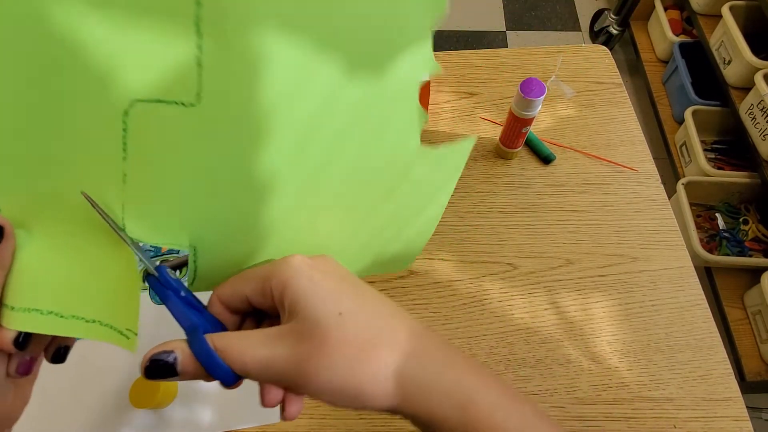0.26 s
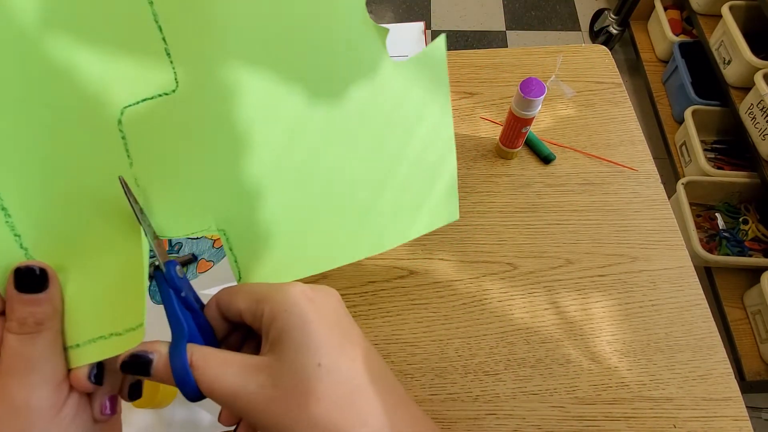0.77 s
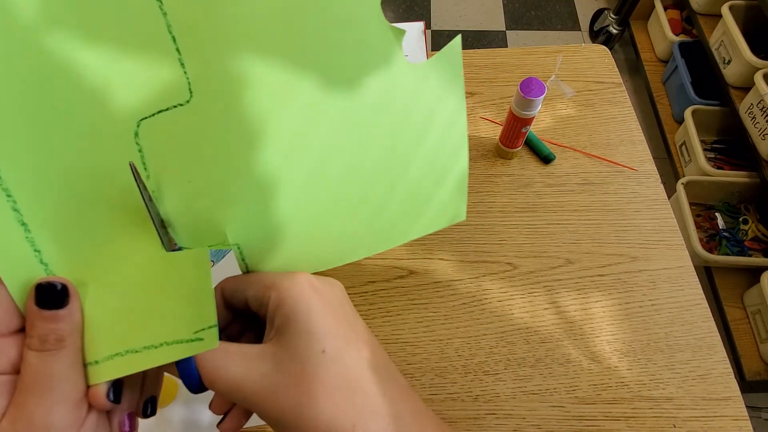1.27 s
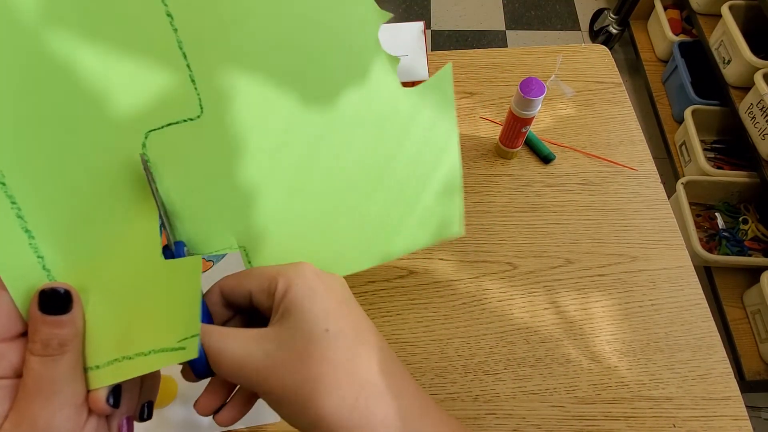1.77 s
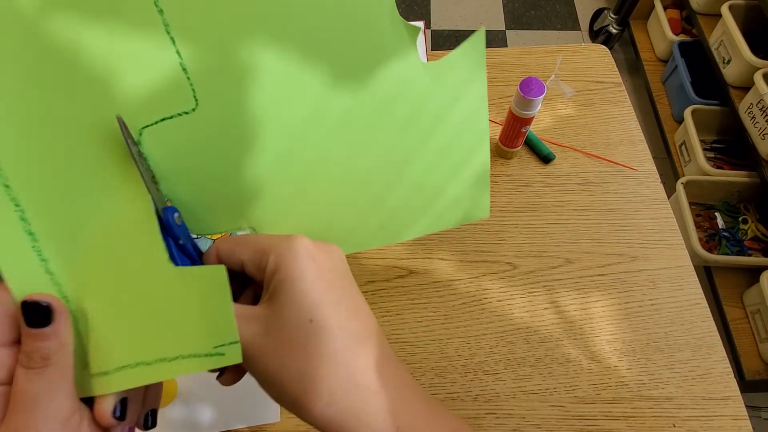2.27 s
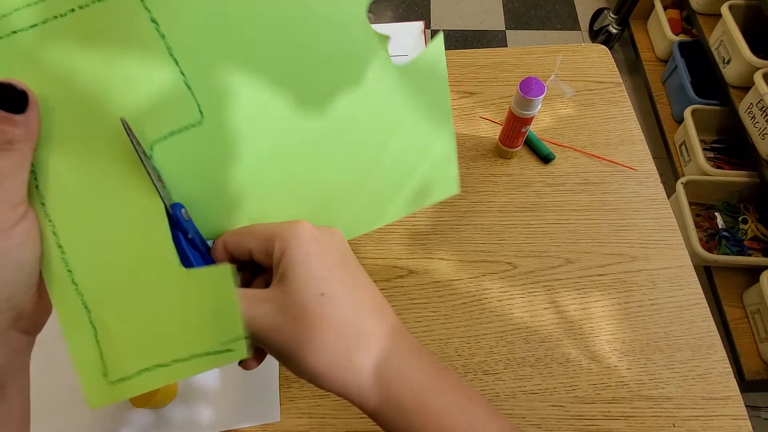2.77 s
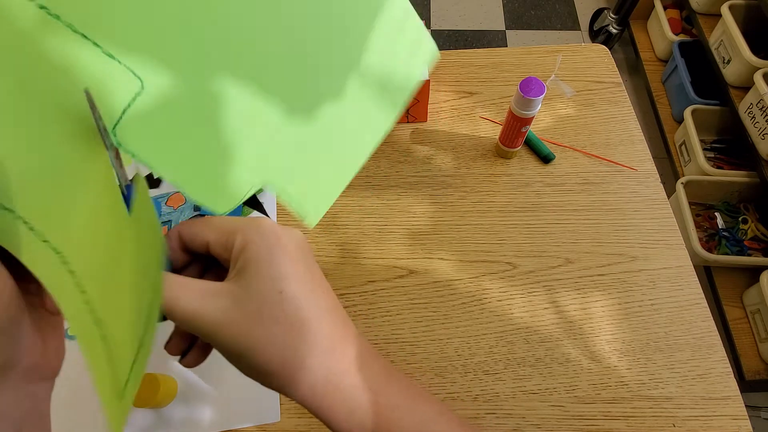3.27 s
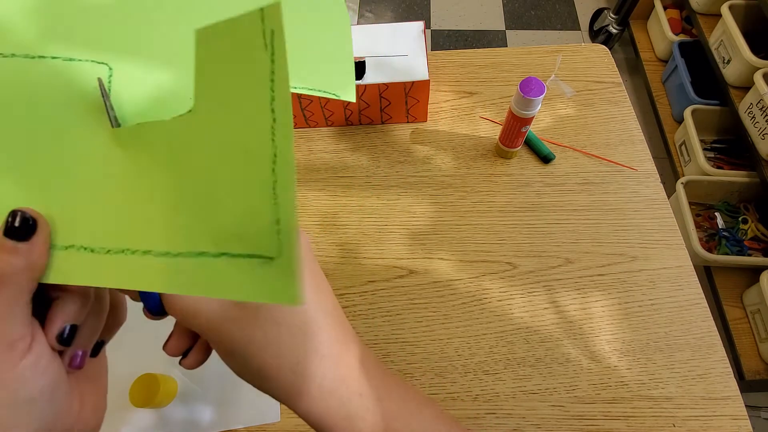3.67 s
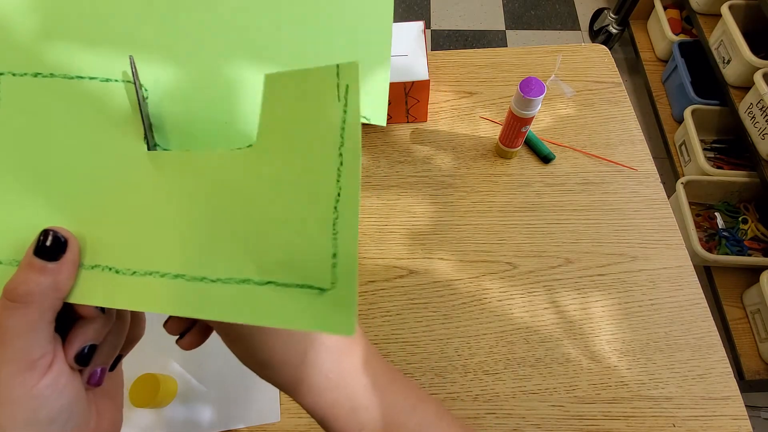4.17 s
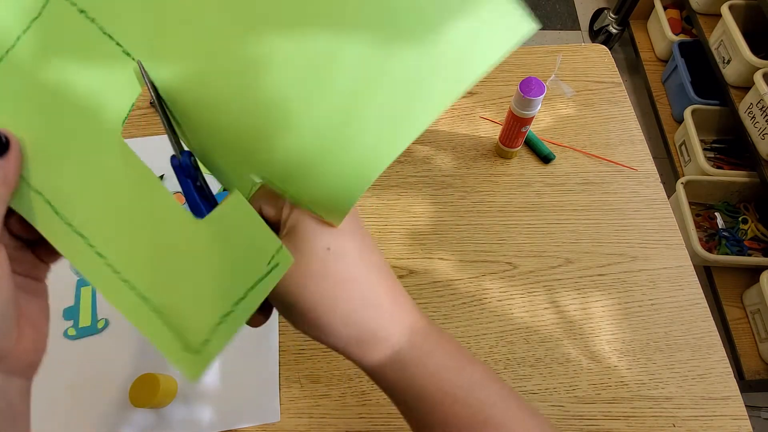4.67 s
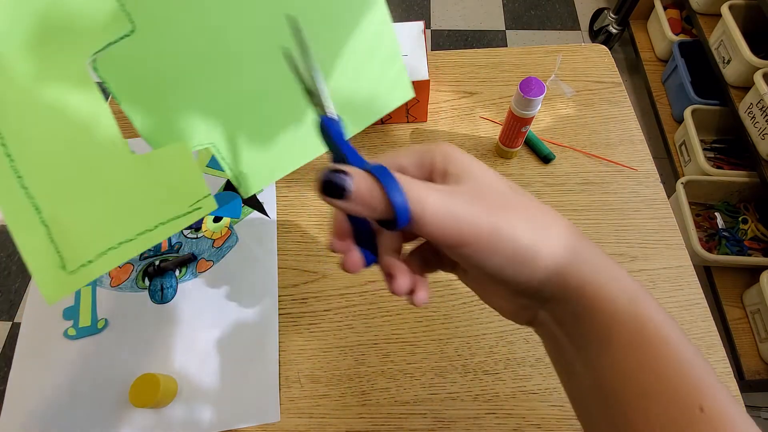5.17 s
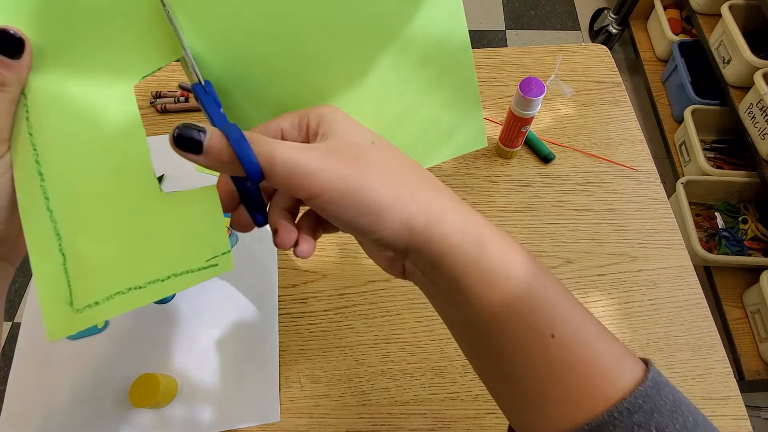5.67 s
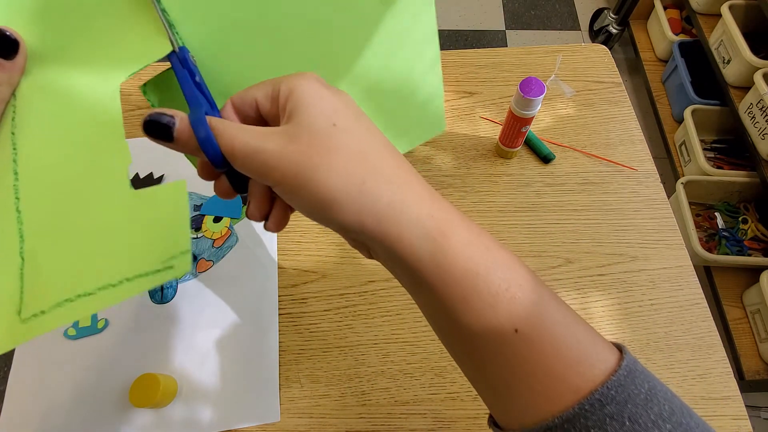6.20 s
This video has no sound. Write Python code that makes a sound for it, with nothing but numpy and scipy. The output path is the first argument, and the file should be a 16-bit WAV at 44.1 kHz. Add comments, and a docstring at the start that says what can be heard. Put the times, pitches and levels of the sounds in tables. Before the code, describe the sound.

Close-up of scissor blades rubbing and biting through stiff card, with crisp clicks, papery pops and low bumps over faint ventilation.

```python
"""A quiet room with ventilation and a low hum that soon fades; paper and scissors close to the stereo microphone.
The held sheet rustles and the blades rub forward along the cut, over a desk that scatters the sound.
Each closing stroke then bursts fibres in uneven bites, among short bright clicks of blades and crackling paper,
buckles of the stiff sheet and low bumps; early on the blades snap shut hard with two close cracks.
Later the sheet buckles and slides through the fingers as it is turned, and further strokes cut on to the end."""
import sys
import numpy as np
from scipy import signal
from scipy.fft import rfft, irfft, next_fast_len
from scipy.io import wavfile

SR = 44100
rng = np.random.default_rng(int(sys.argv[2]) if len(sys.argv) > 2 else 0)


def transcribe(u):
    """Save the signal u as a 16-bit wav file named by the first command-line argument.

    u: samples, shape (n,) or (channels, n), limited to [-1, 1]; the rate is SR.
    q: integer samples, one column per channel.
    """
    v = np.clip(np.atleast_2d(u).T, -1, 1)
    q = np.round(v * 32767).astype(np.int16)
    wavfile.write(sys.argv[1], SR, q)


N = 284004
TIME = np.arange(N) / SR  # s
SIZE = next_fast_len(N + SR // 2, True)  # padded transform length
HZ = np.maximum(np.fft.rfftfreq(SIZE, 1 / SR), 1)

# closing strokes, levels before trims: (start [s], end [s], grinding [dB], treble re body [dB],
# low ring of the sheet [Hz], ring of the blades [Hz], crispness [dB], left re right [dB])
STROKES = [(0.33, 0.488, -57, 9, 723, 2380, 2.5, 2.5), (.785, 0.946, -45.5, -5.5, 770, 2500, 3, 2.5),
           (1.313, 1.424, -41, -7, 643, 3780, 10, -1), (1.812, 1.867, -34.5, -3.5, 438, 2580, 1.5, -2.5),
           (2.133, 2.279, -53, -4, 740, 3620, 9.5, -1.5), (3.573, 3.649, -40.5, -6.5, 720, 3200, 6, 5),
           (3.896, 4.01, -45.5, -3.5, 707, 2450, 6, 1.5), (4.221, 4.292, -42.5, -9, 725, 2220, 8, 2.5),
           (4.406, 4.492, -50, 5.5, 660, 2500, -5, -2), (5.817, 5.946, -39, -13, 820, 3280, 7.5, 1),
           (6.021, 6.124, -45, -15, 715, 3240, 5, -1.5), (6.174, 6.279, -40, -6.5, 920, 2130, 6, 1)]
# forward pushes of the blades along the paper, levels before trims: (start [s], length [s], level [dB],
# treble re level [dB], ring of the paper edge [Hz], left re right [dB])
RUBS = [(-.06, 0.12, -45.5, -2.5, 2630, 0.5), (0.036, 0.15, -42, -6.5, 2570, -0.5),
        (0.175, 0.2, -57, 3, 2600, 0), (0.512, 0.084, -46.5, -2, 2520, 4),
        (0.649, 0.082, -38.5, -5.5, 2600, -0.5), (0.958, 0.078, -52.5, -7, 2580, 0),
        (1.104, .17, -38.5, -5, 2940, -1.5), (1.503, 0.12, -43, -6.5, 2670, -2.5),
        (1.72, 0.21, -74, 17, 7200, -2), (1.932, 0.15, -41, -2, 2480, 1), (2.244, .16, -51, -9, 3220, -3.5),
        (3.723, 0.13, -37.5, -6, 2600, 1.5), (4.07, 0.1, -38.5, -7, 2140, 1),
        (4.353, 0.057, -51, -8, 2190, -6), (5.353, .105, -43, -5.5, 2400, 1.5),
        (5.437, 0.35, -42.5, -3.5, 1250, 0), (6.006, 0.14, -40.5, -4, 1180, 2.5),
        (6.343, 0.12, -40, -3.5, 2570, 3)]


def from_db(db):
    """Decibels to gain."""
    return 10 ** (np.asarray(db) / 20)


def rms_one(x):
    """Scale to an rms of one."""
    return x / np.sqrt(np.mean(x ** 2) + 1e-20)


def at_hz(points):
    """A short spectrum read on the fine frequency grid, straight lines over log frequency."""
    hz, value = np.transpose(points)
    return np.interp(np.log(HZ), np.log(hz), value)


def edge(x, hz, kind, order=2):
    """Butterworth low- or high-pass."""
    sections = signal.butter(order, min(hz, .45 * SR), kind, fs=SR, output="sos")
    return signal.sosfilt(sections, x + 1e-18)


def resonance(x, hz, width_hz):
    """Two-pole resonance with a gain of one on top."""
    r = np.exp(-np.pi * width_hz / SR)
    feed = np.array([1, 0, -1]) * (1 - r * r) / 2
    return signal.lfilter(feed, [1, -2 * r * np.cos(2 * np.pi * hz / SR), r * r], x + 1e-18)


def colour(x, gain):
    """Causal (minimum-phase) filter that keeps the power of white noise."""
    cepstrum = irfft(np.log(rms_one(gain) + 1e-5), SIZE)
    # folding the cepstrum onto positive time gives minimum phase
    cepstrum[1:SIZE // 2] *= 2
    cepstrum[SIZE // 2 + 1:] = 0
    return irfft(rfft(x, SIZE) * np.exp(rfft(cepstrum)), SIZE)[..., :N]


def body_and_treble(body, treble, spectrum, split_hz):
    """One colour whose lower and upper parts are driven separately."""
    gain = from_db(at_hz(spectrum))
    lower = 1 / np.sqrt(1 + (HZ / split_hz) ** 10)
    return colour(body, gain * lower) + colour(treble, gain * np.sqrt(1 - lower ** 2))


def grains(per_s, spread_db):
    """Random tiny clicks of uneven size, each with a common and a differing part at the two ports; rms 1."""
    sizes = from_db(spread_db * np.minimum(rng.exponential(1, N), 4))
    struck = rng.random(N) < per_s / SR
    return rms_one(struck * sizes * rng.standard_normal((2, N)))


def swell(t, rise_s, decay_s):
    """Exponential rise to one at t = 0, then exponential decay."""
    rise = np.minimum(t, 0) / max(rise_s, 1e-4)
    decay = np.maximum(t, 0) / max(decay_s, 1e-4)
    return np.exp(rise - decay)


def ports(x, pan_db=0):
    """The microphone pair: common and differing parts become left and right, alike in the bass, left earlier."""
    # likeness of left and right, held between 0 and .99 below: (frequency [Hz], likeness [1])
    likeness = [(100, 1.5), (600, 12.5), (1300, 0.73), (2600, 0), (4500, -0.28), (12000, 0.18)]
    # balance of the pair: (frequency [Hz], left re right [dB])
    balance = [(100, 2.5), (600, 2), (1200, 3.5), (2600, 1.5), (4500, -6.5), (7500, -4.5), (11000, 0)]
    left_lead_s = .0001
    common, differing = rfft(x, SIZE)
    alike = np.clip(at_hz(likeness), 0, .99)
    sign = np.array([[1], [-1]])
    pair = np.sqrt((1 + alike) / 2) * common + sign * np.sqrt((1 - alike) / 2) * differing
    pair = pair * from_db(sign * at_hz(balance) / 2)
    pair[1] *= np.exp(-2j * np.pi * HZ * left_lead_s)  # delays the right
    return irfft(pair, SIZE)[:, :N] * from_db(sign * pan_db / 2)


def stick_slip(depth_db, hz):
    """The edges catch and let go, so the force flutters at random below a given rate; rms 1."""
    flutter = rms_one(edge(rng.standard_normal(N), hz, "low"))
    return rms_one(from_db(depth_db * np.tanh(flutter)))


def room(x, wet_db=-25, t60=0.25, early_db=-12, early_t60=0.071, wall_hz=6000):
    """Quick scatter from the desk and the sheet, then a faint, duller tail from the walls."""
    t = TIME[:SR // 2]
    early, late = rng.standard_normal((2, 2, len(t)))
    early = rms_one(early * from_db(-60 * t / early_t60) * (t > .002))
    late = rms_one(edge(late, wall_hz, "low", order=1) * from_db(-60 * t / t60) * (t > .012))
    response = (from_db(early_db) * early + from_db(wet_db) * late) / np.sqrt(len(t))
    return x + signal.fftconvolve(x, response, axes=1)[:, :N]


def glance(x, delay_s, depth, wander, per_s=7):
    """A reflection off the nearby sheet; its path wanders as the sheet moves, so the colour shifts."""
    knots = np.arange(0, TIME[-1] + 1, 1 / per_s)
    paths = delay_s * np.exp(wander * rng.standard_normal((len(knots), 2)).T)
    echo = [np.interp(TIME - np.interp(TIME, knots, path), TIME, side) for path, side in zip(paths, x)]
    return (x + depth * np.array(echo)) / np.sqrt(1 + depth ** 2)


def background(hum_db=0):
    """Steady ventilation rumble and hiss from filtered noise, with a sine hum at first."""
    # colour of the room tone: (frequency [Hz], relative density [dB per Hz])
    room_tone = [(15, -41), (25, -34), (53, -8.5), (70, -2), (87, -2.5), (170, -14.5), (223, -9.5),
                 (326, -18), (394, -8.5), (545, -18.5), (624, -14), (911, -31.5), (2280, -36.5),
                 (9070, -51.5), (16000, -60.5)]
    # low hum in the room: (frequency [Hz], rms level [dB])
    low_hum = [(123.8, -57.5)]
    room_tone_db, hum_end_s, hum_fade_s = -56, 1.6, .4
    air = from_db(room_tone_db) * colour(rng.standard_normal((2, N)), from_db(at_hz(room_tone)))
    (hz, level_db), = low_hum
    hum = from_db(level_db + hum_db) * np.clip((hum_end_s - TIME) / hum_fade_s, 0, 1)
    return ports(air) + hum * np.sqrt(2) * np.sin(2 * np.pi * hz * TIME)


def friction(movements, spectrum, per_s, spread_db, body_db, treble_db):
    """Paper fibres catch and slip so densely that they merge into a hiss."""
    body, treble, pan_db = np.zeros((3, N))
    for rows in movements:
        s, level_db, bright_db, side_db = np.transpose(rows)
        moving = np.interp(TIME, [s[0] - .008, s[0], s[-1], s[-1] + 0.015], [0, 1, 1, 0])
        on = moving > 0
        body[on] += moving[on] * from_db(np.interp(TIME[on], s, level_db + body_db))
        treble[on] += moving[on] * from_db(np.interp(TIME[on], s, level_db + bright_db + treble_db))
        pan_db[on] = np.interp(TIME[on], s, side_db)
    slips = grains(per_s, spread_db)
    return ports(body_and_treble(body * slips, treble * slips, spectrum, split_hz=4430), pan_db)


def holds():
    """While it is held, the sheet creeps evenly against the fingers; then it settles."""
    # faint rustle of the held sheet, before trims: (start [s], end [s], level [dB])
    held = [(0, 2.04, -60), (2.139, 2.34, -57.5), (2.8, 3.38, -56.5), (3.58, 4.88, -68.5),
            (4.89, 4.99, -61), (5.4, 6.44, -67.5)]
    treble_db, release_s, release_db = -3, .15, 12
    return [[(start, db, treble_db, 0),
             (end, db, treble_db, 0),
             (end + release_s, db - release_db, treble_db, 0)]
            for start, end, db in held]


def pushes(count=25):
    """In each push the blades speed up and slow down in a half sine, and the rubbing follows their speed."""
    speed_power = 1.44  # the rubbing grows with the speed to this power
    phase = (np.arange(count) + .5) / count
    speed_db = 20 * np.log10(np.sin(np.pi * phase))
    return [[(start + length * p, db + speed_power * v, bright_db, side_db) for p, v in zip(phase, speed_db)]
            for start, length, db, bright_db, _, side_db in RUBS]


def edge_ring(x, ring=0.92, ring_width_hz=450):
    """In each movement the blades rub a different length of paper edge, which picks out its own band."""
    out = x.copy()
    for start, length, _, _, hz, _ in RUBS:
        near = slice(max(int(start * SR), 0), int((start + length) * SR))
        out[:, near] += ring * resonance(x[:, near], hz, ring_width_hz)
    return out


def rubbing():
    """Held sheet and pushed blades hiss by friction, ring with the paper edge and flutter."""
    # colour of the rubbing: (frequency [Hz], relative density [dB per Hz])
    rub_colour = [(60, -19), (250, -9), (450, 1.5), (750, 5), (950, -8.5), (1250, 2.5), (2000, -4),
                  (2700, -3), (3500, -6.5), (4300, -16.5), (6500, -16), (8100, -15.5), (9300, -27.5),
                  (15000, -24.5)]
    hiss = friction(holds() + pushes(), rub_colour, per_s=12000, spread_db=0.5, body_db=-2.0, treble_db=-4.5)
    return edge_ring(hiss) * stick_slip(depth_db=3.5, hz=147.0)


def all_bites(count=12):
    """The big bites, and a run of small ones at uneven gaps through every stroke."""
    # big bites, in a stroke or at a crease, before trims:
    # (time [s], length [s], body [dB], treble re body [dB])
    big_bites = [(0.328, 0.021, -41.5, 4.5), (0.368, 0.0074, -36, 5), (0.441, 0.0015, -31.5, -6),
                 (0.445, 0.0095, -33.5, -1), (0.4684, 0.0042, -31.5, -2), (0.528, 0.0011, -35, -1),
                 (.79, 0.0086, -29, -6), (.833, 0.0055, -33.5, -6.5), (.8563, 0.012, -35, -3),
                 (0.89, 0.0084, -35.5, -2), (1.2565, 0.003, -35.5, 5.5), (1.3156, 0.0052, -30, -4.5),
                 (1.326, 0.03, -26, -4.5), (1.352, 0.0087, -26.5, -5.5), (1.3635, .009, -24.5, -1.5),
                 (1.3863, 0.0034, -37, 3), (1.4035, 0.0062, -27, -.5), (1.4356, 0.0066, -35, -3.5),
                 (1.661, 0.0021, -34, -6), (1.682, 0.028, -39.5, 0), (1.8225, 0.018, -26, -4),
                 (1.8473, 0.0066, -29, -1), (1.853, 0.0031, -35, -3), (2.143, 0.016, -34.5, -8),
                 (2.168, 0.028, -32.5, -12), (2.198, 0.0059, -34, -7.5), (2.233, 0.0037, -32.5, -3),
                 (2.262, 0.0032, -38.5, -0.5), (2.33, 0.0085, -40, 0.5), (2.3707, 0.013, -37, -7),
                 (2.7787, 0.0037, -31.5, 2), (3.5785, 0.006, -26.5, -5), (3.601, 0.02, -32, -6.5),
                 (3.9116, 0.0095, -34, 3), (3.93, .0016, -36, 5.5), (3.948, 0.015, -33, -2),
                 (3.9673, 0.0087, -29.5, -11), (4.008, 0.0065, -36.5, -9.5), (4.2202, 0.0067, -35.5, -5),
                 (4.24, 0.0037, -32.5, -10), (4.2625, 0.0028, -31, -5.5), (4.2935, 0.01, -33.5, -8),
                 (4.3746, 0.0036, -39, 3.5), (4.4178, 0.0029, -42, 15.5), (4.441, 0.0052, -41, -1),
                 (4.4608, 0.0023, -41.5, 19), (4.482, 0.013, -39, 8), (4.9572, 0.021, -45, 3.5),
                 (5.3626, .009, -33.5, -3.5), (5.7905, 0.0077, -37, -2.5), (5.8107, .014, -28, -11.5),
                 (5.839, 0.021, -27.5, -6.5), (5.862, 0.012, -28, -11), (5.89, 0.018, -32, -11.5),
                 (5.93, .005, -34, -13), (6.066, 0.0077, -28.5, -8), (6.186, 0.0069, -30, -13),
                 (6.2, 0.021, -31.5, -5.5), (6.223, 0.015, -30.5, -10), (6.247, 0.011, -31, -6),
                 (6.2895, 0.0036, -29.5, -14.5)]
    gap_s, small_s, above_grind_db, spread_db = .022, .003, 5, 2.5
    bites = list(big_bites)
    draws = rng.standard_normal((len(STROKES), 2, count))
    for (start, end, grind_db, bright_db, *_), (gaps, sizes) in zip(STROKES, draws):
        times = start + gap_s * (np.cumsum(np.exp(0.27 * gaps)) - .5)
        bites += [(s, small_s, grind_db + above_grind_db + spread_db * size, bright_db)
                  for s, size in zip(times, sizes) if s < end]
    return bites


def cutting(rise_s=0.00034, decay_s=0.0028, crack=4.0, ring=1.0, ring_width_hz=80, blade_ring=1.0,
            blade_width_hz=260, body_db=-3.0, treble_db=-.5, grind_db=1.1):
    """The closing blades grind steadily; each bite opens with a crack and goes on as breaking fibres."""
    # colour of the cut: (frequency [Hz], relative density [dB per Hz])
    cut_colour = [(60, -17.5), (200, -14), (350, -2.5), (600, 5), (780, 4), (980, -6), (1300, -1.5),
                  (2050, -8.5), (2600, -6.5), (3500, -10), (4400, -16), (8100, -18), (9300, -31.5),
                  (15000, -28)]
    # the high ring of the sheet sinks with every stroke as the cut flap grows
    sheet_high_hz, sink_hz_per_stroke = 1368, 16
    force = np.zeros((2, N))  # body, treble
    cracks, pan_db = np.zeros((2, 2, N)), np.zeros(N)
    for start, end, level_db, bright_db, *_, side_db in STROKES:
        closing = np.interp(TIME, [start - .001, start + 0.0092, end - .01, end + 0.0116], [0, 1, 1, 0])
        force += np.outer(from_db(level_db + grind_db + np.array([0, bright_db])), closing)
        pan_db += side_db * closing
    force *= stick_slip(depth_db=5, hz=220)
    for (s, length, level_db, bright_db), signs in zip(all_bites(), rng.choice([-1, 1], size=(256, 2))):
        near = slice(int((s - .005) * SR), int((s + .04) * SR))
        t = TIME[near] - s
        strength = from_db(level_db + np.array([0, bright_db]))
        burst = swell(t - np.clip(t, 0, length), rise_s, decay_s)  # holds full force for its length
        force[:, near] = np.maximum(force[:, near], np.outer(strength, burst))
        cracks[:, :, int(s * SR)] = crack * np.outer(strength, signs)
    fibres = force[:, None] * grains(per_s=9000, spread_db=1.0)
    body, treble = fibres * stick_slip(depth_db=3.0, hz=454.5) + cracks
    sound = body_and_treble(from_db(body_db) * body, from_db(treble_db) * treble, cut_colour, split_hz=1820)
    # the free lengths of sheet and blade change with every stroke, and so do their resonances
    for k, (start, end, _, _, low_hz, blade_hz, crisp_db, _) in enumerate(STROKES):
        high_hz = sheet_high_hz - sink_hz_per_stroke * k
        part = sound[:, int(start * SR):int((end + .03) * SR)]
        sheet = resonance(part, low_hz, ring_width_hz) + resonance(part, high_hz, ring_width_hz)
        blades = resonance(part, blade_hz, blade_width_hz)
        crisp = (from_db(crisp_db) - 1) * resonance(part, hz=11800, width_hz=6500)
        part += ring * sheet + blade_ring * blades + crisp
    return ports(sound, pan_db)


def clicking(level_db=-1.0, decay_s=0.00045):
    """Short bright clicks of blades and crackling paper: a brief noise burst excites short resonances."""
    # clicks, before the trim: (time [s], peak [dB], treble [dB])
    clicks = [(0.44, -18.5, -14), (0.528, -25, -12), (0.912, -25, 2), (1.259, -25, 4), (1.51, -34, 7),
              (2.263, -32, 9), (2.4, -26, -11), (2.441, -35.5, -9), (2.779, -22.5, 4), (3.58, -32, 9),
              (4.377, -29, -7), (5.33, -43.5, -12.5), (5.34, -43, -12), (5.371, -21.5, 0), (5.418, -34, -2),
              (6.068, -26, -6.5)]
    # resonances of a click, the last being the treble one: (frequency [Hz], width [Hz], level [dB])
    click_modes = [(1380, 100, -1.5), (2426, 160, 1), (3394, 210, 3), (5800, 370, -2), (7800, 800, -40.5),
                   (11860, 1200, -3.5)]
    out, t = np.zeros((2, N)), TIME[:SR // 30]
    for s, db, treble_db in clicks:
        burst = rng.standard_normal((2, len(t))) * np.exp(-t / decay_s)
        modes = [from_db(mode_db) * rms_one(resonance(burst, hz, width_hz))
                 for hz, width_hz, mode_db in click_modes]
        click = sum(modes[:-1]) + from_db(treble_db) * modes[-1]
        first = int(s * SR)
        out[:, first:first + len(t)] += from_db(db + level_db) * click / np.abs(click).max()
    return ports(out)


def buckles_and_bumps(dispersion=0.56, puff_cycles=2.84, puff_length=0.93, level_db=3.5):
    """Sheet buckles and low hand or desk bumps: resonances whose high ones die first, with a puff of air."""
    # buckles of the sheet and low bumps of hand or desk, before trims:
    # (time [s], level [dB], rise [s], decay [s], pitch re usual [1])
    movements = [(.716, -31, .0071, 0.021, 1.03), (.928, -28, 0.00054, 0.018, 0.98),
                 (1.706, -34.5, 0.02, 0.018, 0.55), (1.73, -44, 0.0086, 0.029, 0.92),
                 (2.397, -36, 0.0019, .021, 0.95), (2.682, -33.5, 0.01, 0.019, 1.05),
                 (2.712, -34, 0.011, 0.02, 1), (2.798, -36.5, 0.021, 0.016, 1.3),
                 (2.853, -19.5, .004, 0.0099, 1.01), (2.876, -29.5, 0.015, 0.022, 1.01),
                 (2.9, -29.5, .01, 0.016, 1.01), (2.97, -36.5, 0.002, 0.0079, 1.07),
                 (2.991, -32, 0.0066, 0.015, 1.08), (3.14, -30.5, 0.00017, 0.0079, 0.98),
                 (3.423, -47, 0.0047, 0.022, 0.84), (3.93, -43.5, 0.01, 0.033, 0.98),
                 (4.298, -44, 0.0084, 0.028, 0.84), (4.652, -28, 0.01, 0.015, .95),
                 (4.927, -38.5, 0.0063, 0.012, 0.97), (4.988, -40.5, 0.021, 0.02, 1.1),
                 (5.04, -48, 0.0094, 0.017, 1), (6.034, -34, 0.0067, 0.0078, 1.09)]
    # broad resonances of the bending sheet: (frequency [Hz], width [Hz], relative level [dB])
    sheet_modes = [(408, 280, -5.5), (564, 89, -6.5), (735, 91, -4.5), (1250, 220, -2.5), (1600, 1500, -6),
                   (2760, 540, -3)]
    # a harder movement is brighter: its top lies at usual_top_hz for a level of top_at_db
    usual_top_hz, top_at_db, db_per_top_octave = 1472, -34, 15
    # a slower one pushes more air: puff re its level at a decay of puff_at_s, gain per doubled decay
    puff_re_db, puff_at_s, puff_doubling_db = -5, 0.021, 14
    out, t = np.zeros((2, N)), TIME[:SR // 3]
    total = np.sqrt(sum(from_db(db) ** 2 for hz, width, db in sheet_modes))
    for s, db, rise_s, decay_s, pitch in movements:
        top_hz = usual_top_hz * 2 ** ((db - top_at_db) / db_per_top_octave)
        puff_db = db + puff_re_db + puff_doubling_db * np.log2(decay_s / puff_at_s)
        first = int((s - .08) * SR)  # leaves time for the rise
        since, wobble = t + first / SR - s, 0
        for usual_hz, width_hz, mode_db in sheet_modes:
            hz = pitch * usual_hz
            wave = resonance(rng.standard_normal((2, len(t))), hz, 2 * width_hz)
            wave = rms_one(resonance(wave, hz, 2 * width_hz))
            envelope = swell(since, rise_s, decay_s * (800 / hz) ** dispersion)
            wobble = wobble + from_db(mode_db) / total * wave * envelope
        puff_hz = puff_cycles / max(decay_s, .004)  # a slower movement pushes a deeper puff
        puff = edge(rng.standard_normal((2, len(t))), puff_hz, "low")
        puff = rms_one(edge(puff, puff_hz / 3, "high")) * swell(since, rise_s, puff_length * decay_s)
        bend = from_db(db + level_db) * edge(wobble, top_hz, "low", order=2)
        out[:, first:first + len(t)] += bend + from_db(puff_db) * puff
    return ports(out)


def snapping(crack_db=-7, crack_s=0.0019, rattle_db=-16, rattle_s=0.011):
    """The blades meet with a sharp crack, rattle and ring briefly, damped by the hand."""
    # hard contacts of the blades: (time [s], relative level [dB])
    snaps = [(0.9235, -6.5), (0.9317, -7.5)]
    # ringing of the shut scissors: (frequency [Hz], level re contact [dB], t60 [s])
    blade_modes = [(620, -5, 0.028), (830, -26.5, 0.056), (1430, -17.5, 0.018), (1830, -10.5, 0.028),
                   (2380, -7, 0.023), (2700, -32.5, 0.0093), (3375, -9, .016), (3850, -5, 0.012),
                   (4070, -35.5, 0.0053), (5170, -11.5, 0.013), (6010, -14.5, 0.0083), (7700, -21, 0.0037)]
    # colour of the dense rattle as the blades meet: (frequency [Hz], relative density [dB per Hz])
    clash_colour = [(100, -17), (550, -5), (1000, -17), (1650, 10), (2100, -7), (2600, 5), (3900, -1),
                    (4800, -8), (6500, -10.5), (8200, -12), (9300, -25), (15000, -27.5)]
    clash, rings = np.zeros((2, 2, N))
    t = TIME[:SR // 10]
    for s, db in snaps:
        near = slice(int(s * SR), int(s * SR) + len(t))
        contact = from_db(crack_db) * np.exp(-t / crack_s) + from_db(rattle_db) * np.exp(-t / rattle_s)
        clash[:, near] += from_db(db) * contact * rng.standard_normal((2, len(t)))
        for hz, mode_db, t60 in blade_modes:
            tone = np.sin(2 * np.pi * (hz * t + rng.random((2, 1))))
            rings[:, near] += from_db(db + mode_db - 60 * t / t60) * tone
    return ports(rings + colour(clash, from_db(at_hz(clash_colour))))


def sliding():
    """The sheet slides through the fingers as it is turned: a friction hiss with a slow flutter."""
    # one curve for each turn, before trims: (time [s], level [dB], treble re level [dB], left re right [dB])
    slides = [
        [(2.65, -60, -5, 7), (2.654, -55.5, -5.5, -1.5), (2.788, -51, -8.5, -4.5), (2.83, -48, -15, 5)],
        [(2.96, -56, 0, 3.5), (2.972, -48, -6.5, 0.5), (3.082, -62, -3, 0), (3.126, -54.5, -5, 2),
         (3.302, -49, -2.5, 3), (3.41, -52.5, -7, 6), (3.498, -73.5, -4, 8), (3.52, -84, -5, 3.0)],
        [(4.5, -42, -12.5, 2), (4.542, -52.5, -1.5, -2), (4.58, -41, -6.5, 1), (4.692, -53.5, -4, 1),
         (4.704, -39, -14, 2), (4.806, -41.5, -1, 0.5), (4.872, -47, 6.5, -1), (4.896, -64, -4, -2.0),
         (4.91, -52.5, -1, 3.5)],
    ]
    # colour of the sliding: (frequency [Hz], relative density [dB per Hz])
    slide_colour = [(60, 1.5), (250, -3), (600, 4), (900, 0), (1200, 5.5), (2000, 1.5), (3200, 2.6),
                    (4500, -10), (6500, -9), (8200, -8.5), (9300, -18), (15000, -18.5)]
    hiss = friction(slides, slide_colour, per_s=16000, spread_db=3.5, body_db=2.5, treble_db=5.5)
    return hiss * stick_slip(depth_db=4.0, hz=59)


def scene():
    """Scissors and sheet close to the microphone, in the room."""
    handling = glance(rubbing() + sliding(), delay_s=0.000577, depth=0.29, wander=0.349)
    snips = glance(cutting(), delay_s=0.000784, depth=0.47, wander=0.2)
    close = snips + handling + clicking() + buckles_and_bumps() + snapping()
    return room(close) + background()


def record(dry):
    """The deepest bass is rolled off, full scale limits the peaks, and the top is cut."""
    cutoff_hz = 16100
    limited = np.clip(edge(dry, hz=26, kind="high"), -1, 1)
    return signal.sosfilt(signal.ellip(10, .2, 70, cutoff_hz, fs=SR, output="sos"), limited)


dry = scene()
out = record(dry)
transcribe(out)
```